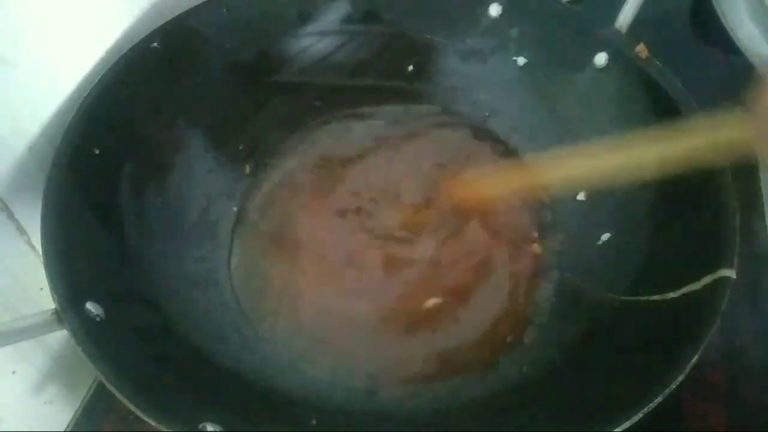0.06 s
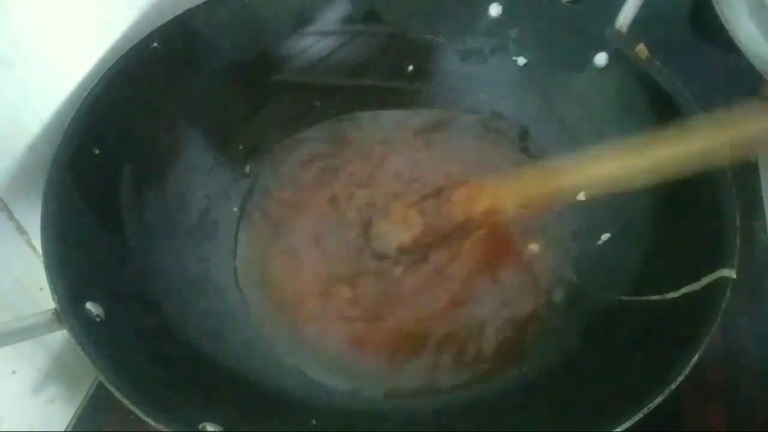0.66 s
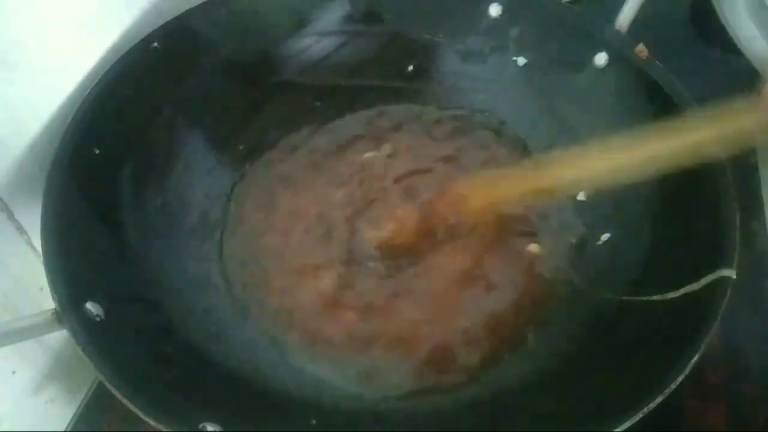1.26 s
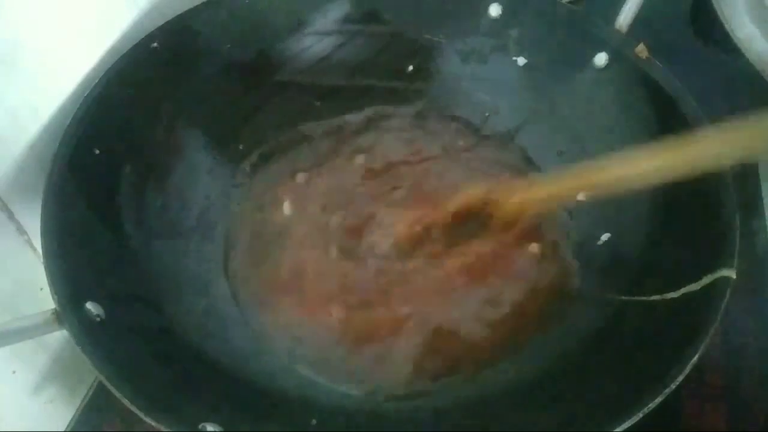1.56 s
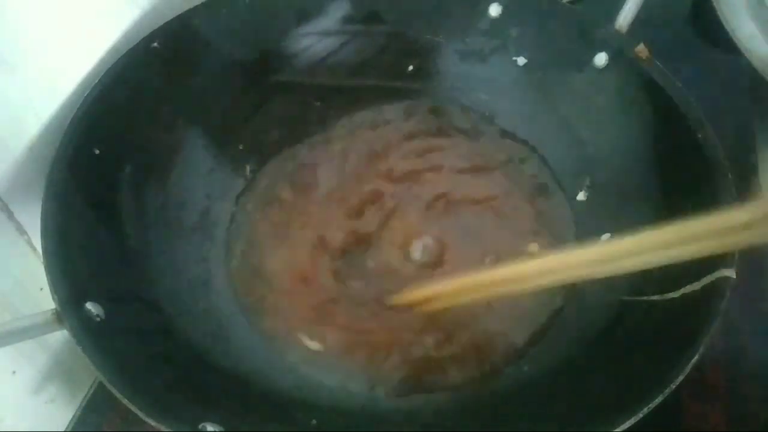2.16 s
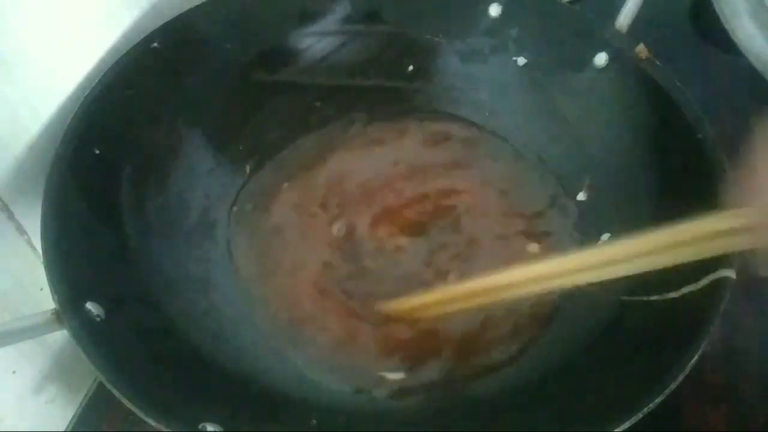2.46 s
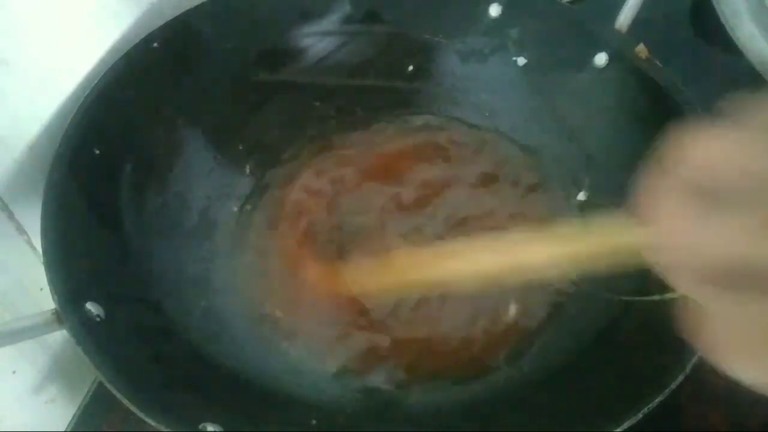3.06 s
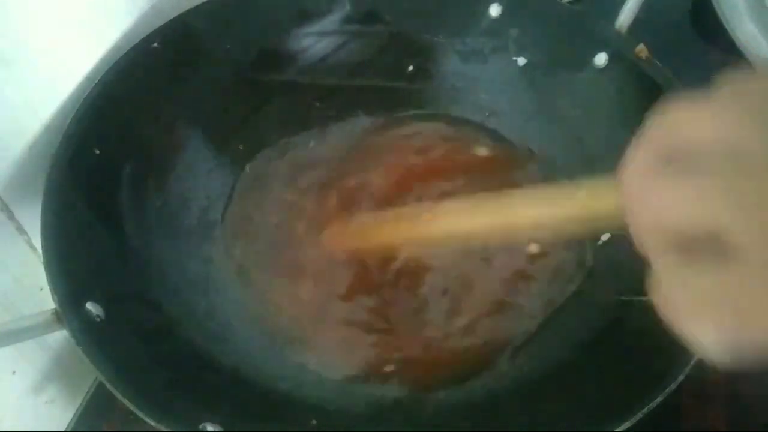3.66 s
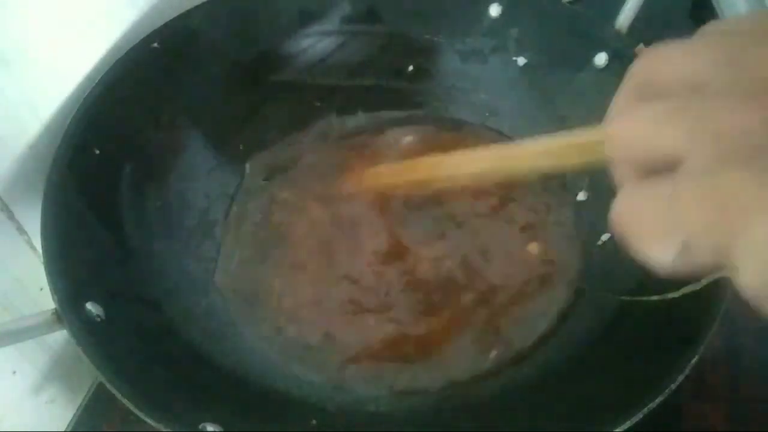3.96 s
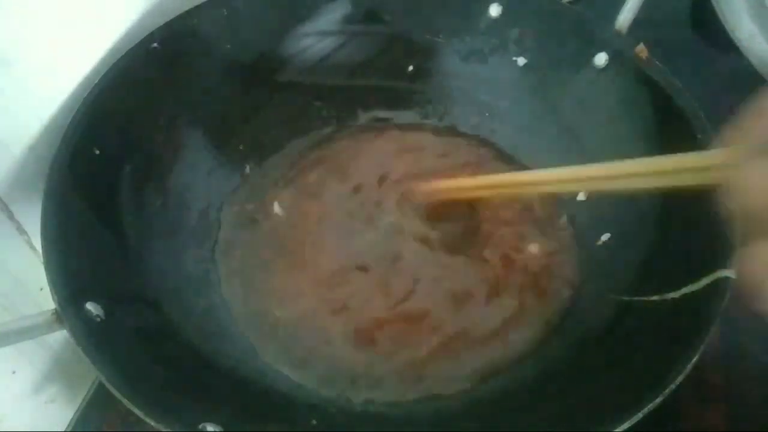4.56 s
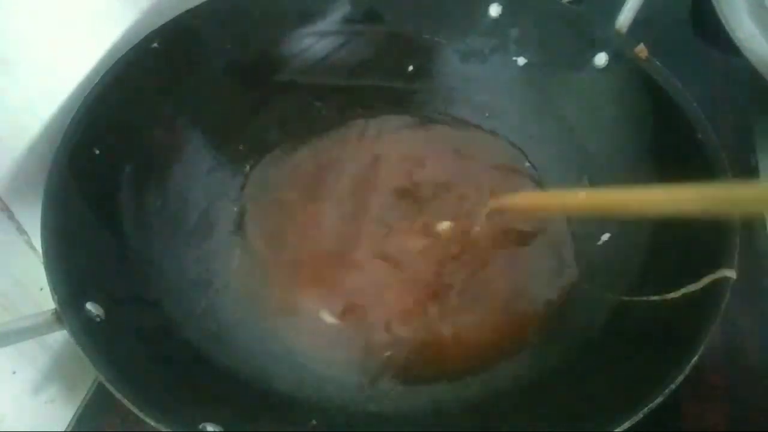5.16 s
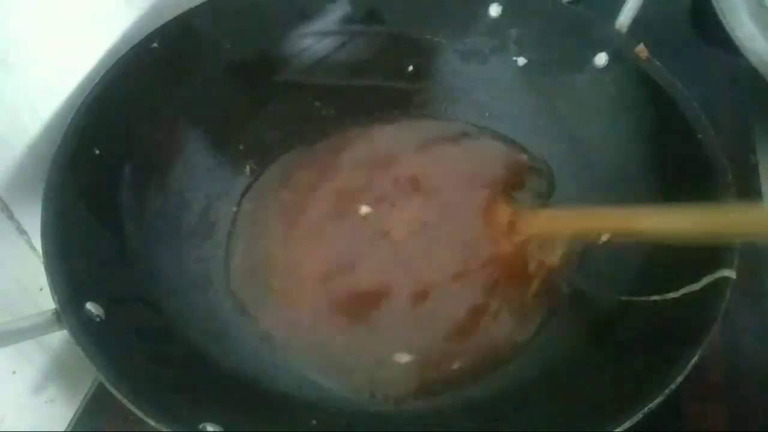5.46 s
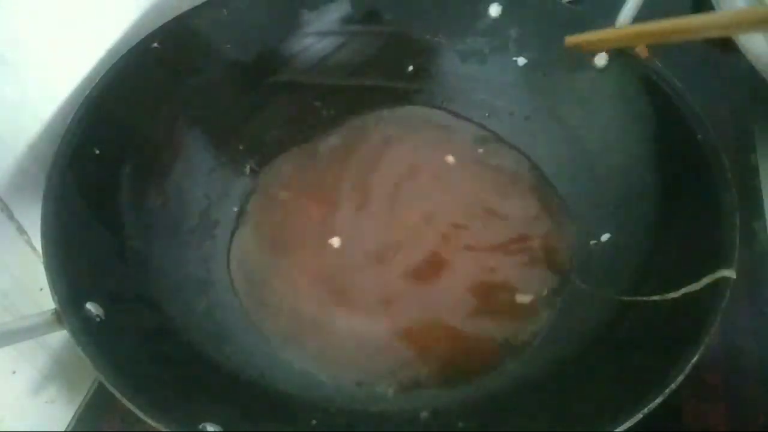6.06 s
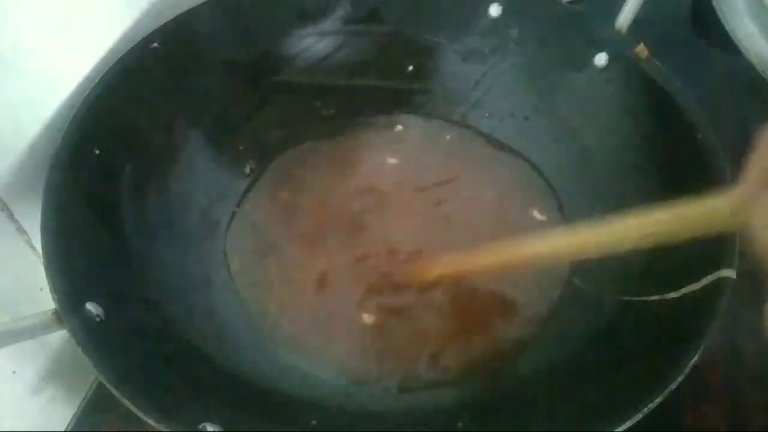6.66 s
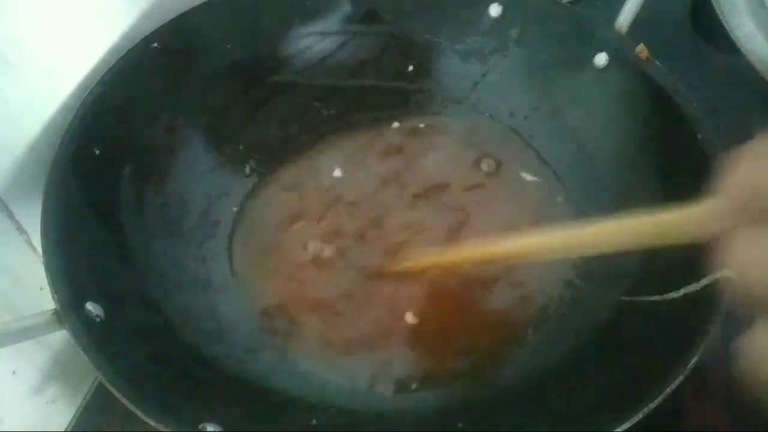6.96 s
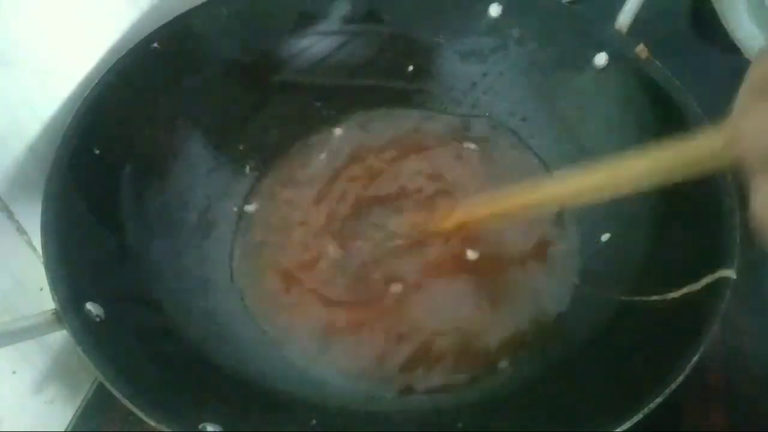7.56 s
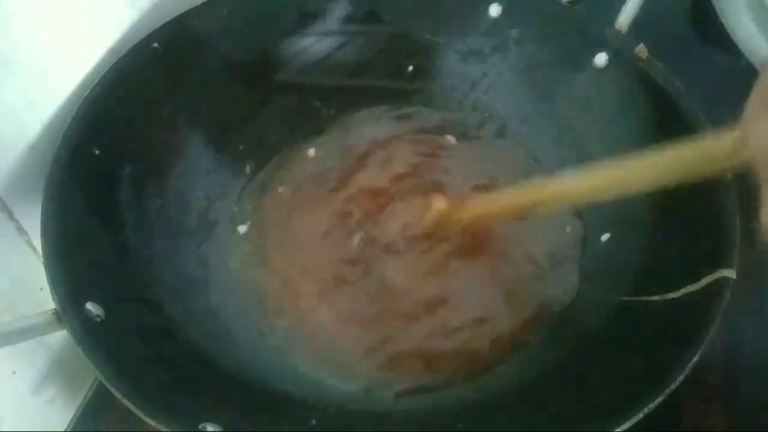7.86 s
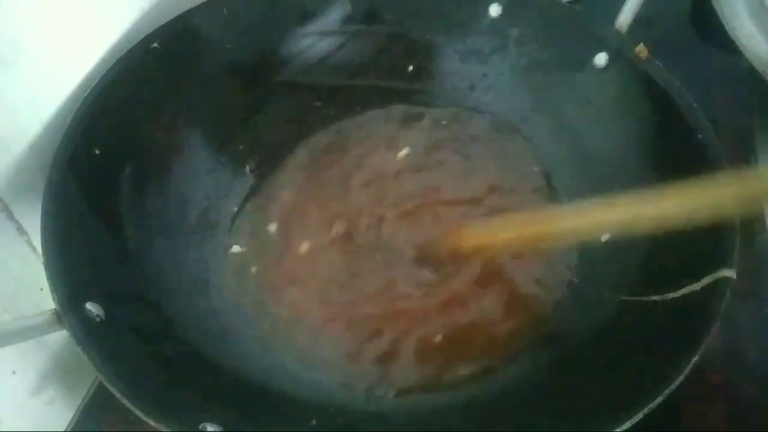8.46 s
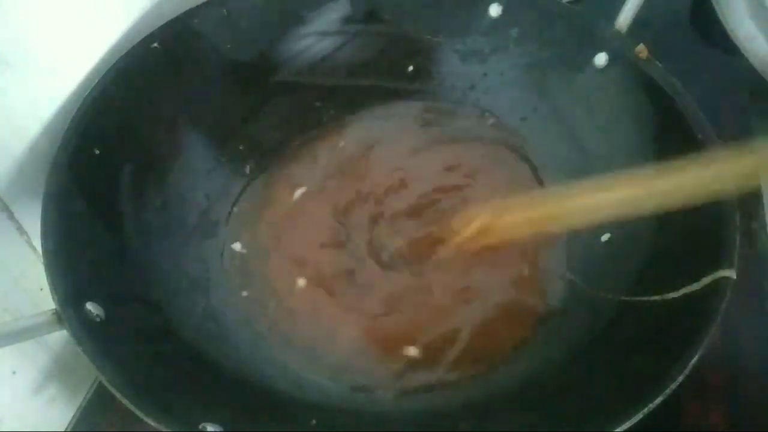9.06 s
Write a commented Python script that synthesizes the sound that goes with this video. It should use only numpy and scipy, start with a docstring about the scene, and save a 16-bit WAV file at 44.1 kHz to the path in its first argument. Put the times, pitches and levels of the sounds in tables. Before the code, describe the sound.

Sauce sizzles in a hot wok throughout, heard close up in a kitchen: a bright, steady, wet hiss of tiny bubbles that swells as the liquid washes over hot metal, with scattered sharp spits. From the start, wooden chopsticks circle about three times a second, rubbing the pan and making short, cushioned metallic knocks with occasional soft squelches. A dull, low bump comes at about 3.8 seconds. The stirring stops near 5 seconds, leaving the sizzle and another soft bump at about 5.3 seconds. At about 6.6 seconds a tip clacks on bare metal with a brief ring, and the scraping, tapping and squelching resume until the end, just after 9 seconds. The sizzle is a little stronger in this last stretch. Underneath, two faint, thin whines, probably from the stove, drift slightly in pitch over a quiet, low drone.

```python
"""Kitchen stove, stereo microphone close to a hot wok of sizzling sauce.
Countless tiny steam bubbles burst at the rim and flare where sauce washes over hot metal; a few spit.
Wooden chopsticks circle about three times a second, rub and knock the wok's modes, squelch, rest, resume.
Two thin whines, probably from the stove, creep in pitch over a few dull bumps and a low kitchen drone."""
import sys
import numpy as np
from scipy import signal
from scipy.fft import rfft, irfft
from scipy.io import wavfile
from scipy.ndimage import uniform_filter1d, map_coordinates

SR = 44100
rng = np.random.default_rng(int(sys.argv[2]) if len(sys.argv) > 2 else 0)


def generate_wav(sig):
    """Save sig (samples, or channels by samples) to the path in sys.argv[1] as 16-bit PCM at SR."""
    pcm = np.round(np.clip(np.atleast_2d(sig).T, -1, 1) * 32767).astype(np.int16)
    wavfile.write(sys.argv[1], SR, pcm)


N = 410967
TIME_S = np.arange(N) / SR

# Sizzle colour. Each row: frequency in Hz, left gain in dB, right gain in dB.
SIZZLE_SPECTRUM = [(610, -26.5, -28), (1710, -20, -18.5), (3800, -30, -32.5), (3780, -14, -14),
                   (5350, -15.5, -13), (5600, -7, -18), (6050, -7.5, -14), (7730, -4, -19),
                   (8100, -13.5, -9), (9590, -9.5, -13.5), (10010, -36, -3.5), (11660, -28, -5.5),
                   (12400, -18, -12.5), (15500, -30, -17)]
# Slow course of the boil. Each row: time in seconds, fizz swell in dB, simmer swell in dB.
BOIL_COURSE = [(0, -2.5, -7.5), (.5, -1.5, -0.5), (1.201, -3, -1.5), (2.1, 1, -1), (2.7, 0.5, -1),
               (3.35, -0.8, -1), (3.55, -3.5, -3), (4.1, -2, 0), (4.5, -1.3, -2.5), (5.1, -4, -6),
               (5.42, -1.5, -5.5), (5.53, 1.5, -4), (6.5, 0.1, -3.5), (7, 0.5, -3), (7.5, 2.5, -1.5),
               (8.15, 0.8, -0.5), (9.32, 0.5, -2)]
# Sauce washing over hot metal. Each row: peak time in seconds, extra fizz in dB, extra simmer in dB.
BOIL_FLARES = [(.1, 2, 0), (.54, 3, 4), (.96, 5, 3), (1.34, 2.5, 2), (1.55, 2.5, 4.5), (1.88, 1.5, 2.5),
               (2.17, 2, -2.5), (2.78, 0, 1.5), (3.65, 3.5, 1.5), (3.83, 5, 1), (4.77, 1, -2),
               (5.2, 3.5, -1), (8.78, 3, -2.5), (9.22, 2, 2.5)]
# Loud spits. Each row: time in seconds, relative snap level in dB, relative splat level in dB, pitch in Hz.
SPIT_EVENTS = [(0.0525, -20.5, -52, 9600), (0.2403, -21, -62, 11500), (2.407, -27, -56, 4830),
               (2.6552, -21, -62, 10800), (2.9194, -19, -53, 11800), (3.0126, -12.5, -50, 10900),
               (3.0186, -21, -60, 11000), (4.27, -20, -58, 10800), (4.3297, -12.5, -54, 11100),
               (4.6104, -18, -48, 10600), (5.0623, -16.5, -51, 10700), (5.3275, -23, -50, 9500),
               (7.0334, -23, -52, 11000), (7.1592, -19, -54, 11000), (7.2734, -21, -51, 14000),
               (7.5322, -12.5, -49, 11500), (8.4395, -14.5, -54, 11300), (8.7783, -22, -56, 7840),
               (8.7975, -13, -53, 11200), (8.804, -20, -60, 11000), (9.1217, -20, -62, 11000),
               (9.2003, -18, -52, 10500), (9.2627, -12.3, -54, 11500)]
# Wok modes. Each row: frequency in Hz, width in Hz, gain in dB touched in sauce, gain in dB on bare wall.
WOK_MODES = [(582, 5, -16, -1), (616, 16, 8, -11), (648, 20, 6, -4), (680, 22, 2, -5), (876, 9, -22, 2),
             (902, 9, -17, 3), (926, 26, -5, -12), (1158, 24, -22, -14), (1362, 45, -18, -11),
             (1445, 27, -4.5, -9.5), (1575, 70, -14.5, -16), (2095, 40, -34, -5), (2640, 45, -30, -13)]
# Path of the tips. Each row: time in seconds, place from 0 (deep in sauce) to 1 (bare wall).
TIP_PLACE = [(0, 0.29), (4.8, 0.35), (6.6, 0.52), (7.4, 0.62), (8, 0.55), (9.3, 0.26)]
# Chopstick strokes. Each row: start in seconds, length in seconds, pressure in dB, scratchiness in dB.
TIP_STROKES = [(0.034, 0.087, -51.5, -55), (0.12, 0.23, -54.5, -49.5), (0.31, 0.29, -50, -49),
               (0.624, 0.14, -50.5, -59), (0.788, 0.067, -50, -45.5), (0.92, 0.21, -51, -50),
               (1.12, 0.34, -49.5, -52), (1.476, 0.088, -52.5, -51), (1.635, 0.19, -52, -50.5),
               (1.865, 0.22, -48.5, -51.5), (2.202, 0.2, -50, -51), (2.511, 0.24, -53.5, -49),
               (2.83, 0.21, -51, -50), (3.177, 0.19, -49, -48.5), (3.477, 0.25, -51.5, -51),
               (3.76, 0.43, -53, -53.5), (4.117, 0.37, -52, -55), (4.502, 0.17, -49, -55),
               (4.988, 0.011, -45, -42), (6.254, 0.067, -59.5, -75), (6.592, 0.23, -57, -62),
               (6.768, 0.1, -48.5, -52), (6.946, 0.26, -50, -53.5), (7.258, 0.27, -48.5, -51.5),
               (7.59, 0.2, -51.5, -50), (7.842, 0.31, -52.5, -59), (8.154, 0.21, -50.5, -55),
               (8.417, 0.22, -50.5, -57), (8.656, 0.19, -56, -75), (8.875, 0.11, -53, -51),
               (9.034, 0.097, -54, -61), (9.167, 0.13, -53, -65)]
# Chopstick knocks. Each row: start in seconds, relative level in dB, place from 0 to 1,
# added damping in Hz (sign ignored), high-mode boost in dB.
TIP_KNOCKS = [(.048, -35.5, 0, 15, -18), (.143, -44, 0.3, 3, 25), (.28, -37, 0.3, -1, 11),
              (.355, -34, 0, 8, 0), (.43, -33, 0, -9, 5), (.46, -47, 0, 0, 33), (.699, -32.5, 0, 9, 1),
              (.74, -29, 0, -4, 36), (.838, -36, 0.3, 7, 24), (.959, -31.5, 0, 18, 3),
              (1.275, -32, 0, 1, -3), (1.54, -30, 0, 21, -2), (1.565, -35.5, 0, 2, 29),
              (1.735, -39.5, 0, 21, 0), (2.01, -33.5, 0.37, 18, -5), (2.255, -31, 0, 28, -11),
              (2.3, -37, 0, 5, 20), (2.53, -39, 0, 28, 7), (2.65, -37.5, 0, 29, -8), (2.9, -37.5, 0, 23, 0),
              (2.958, -37, 0, 31, -10), (3.235, -30.5, 0.4, -1, -6), (3.295, -41, 0.2, 2, 31),
              (3.818, -31, 0, 0, 3), (4.16, -34, 0.06, 18, -9), (4.555, -37, 0.1, 15, 5),
              (4.615, -37, 0.15, 3, -8), (4.675, -38, 0.06, 23, -2), (6.575, -26, 1, 1.5, 4.5),
              (6.703, -38, 0.93, -1, -12), (6.809, -29, 0, -1, -19), (7.122, -38, 0, -4, -4),
              (7.373, -37, 0, 10, -3), (7.445, -37.5, 0.2, 8, -11), (7.612, -32, 0, 56, -6),
              (7.716, -39, 0.2, 20, -4), (8.015, -40, 0, 9, -11), (8.195, -36, 0.4, 4, -10),
              (8.48, -45, 0, 4, -8), (8.79, -44, 0, -3, -6), (8.93, -35.5, 0.14, 17, 3),
              (9.085, -36, 0.03, 10, 8), (9.22, -36, 0.05, -1, -15)]
# Squelches. Each row: start in seconds, length in seconds, centre in Hz, width in Hz, relative level in dB.
SAUCE_SQUELCHES = [(0.351, 0.018, 1460, 800, -41.5), (0.716, 0.036, 1510, 1000, -45.5),
                   (0.935, 0.051, 1500, 1200, -47), (0.995, 0.16, 1540, 1410, -47.5),
                   (1.313, 0.099, 1250, 1110, -47), (4.606, 0.0178, 2520, 348, -42),
                   (4.977, 0.058, 1570, 650, -46), (5.6, 0.025, 1300, 1020, -45),
                   (6.809, 0.056, 2090, 2200, -45), (6.987, 0.054, 1330, 1100, -50.5),
                   (7.067, 0.055, 1280, 900, -51), (7.267, 0.024, 920, 650, -52),
                   (7.375, 0.045, 1040, 650, -50), (7.428, 0.05, 1190, 1000, -47.5),
                   (7.645, 0.0095, 1240, 900, -47)]
# Partials of the rising whine. Each row: harmonic number, start in seconds, end in seconds,
# relative level in dB, hoarseness from 0 to 1.
RISING_PARTIALS = [(41, 5.8, 8.3, -55, .9), (42, -.5, 2.9, -53, 0), (43, -.5, .8, -56, 0),
                   (43, 5.3, 6.6, -50, .3), (43, 8.2, 9.8, -47, .5), (44, -.5, 2.2, -50, .9),
                   (44, 2.5, 5.1, -46.5, .9), (44, 4.7, 6, -54, .1), (44, 5.7, 7.1, -49.5, .2),
                   (44, 7.5, 9.8, -47.5, .9), (45, -.5, 2.5, -54, 0), (45, 6.1, 8.2, -51, .9),
                   (46, -.5, 1.5, -53, 0), (46, 1, 2.8, -47.5, .05), (46, 3, 4.9, -54, .4),
                   (46, 4.7, 5.9, -50, 0), (46, 5.4, 7.6, -43.7, .1), (46, 6.6, 8, -46.5, .9),
                   (47, -.5, 2.9, -51, .05), (47, 4.6, 7.1, -51.5, .15), (48, -.5, 5.1, -48, .7),
                   (48, 4.8, 7, -53, .1), (48, 7.3, 9.8, -50, .9), (49, -.5, 2.4, -56, 0),
                   (49, 6.2, 7.2, -55, .1), (50, -.5, 3, -52, .05), (50, 4.8, 7, -53, .1),
                   (51, -.5, 2.4, -56, .1), (51, 4.8, 6.9, -51, .05)]
# Partials of the whine that sags and recovers. Each row: as above.
SAGGING_PARTIALS = [(38, 2.4, 5.6, -56, .1), (39, 2.8, 4.1, -50.5, .05), (39, 4, 5.6, -55, 0),
                    (39, 6.2, 7.3, -53, .1), (40, -.5, 1.8, -48, .35), (40, 2.2, 4.3, -50, .2),
                    (40, 5.3, 6.4, -46.5, .4), (40, 6.1, 7.1, -52, .4), (40, 7.7, 9.8, -53, .6),
                    (41, 7.5, 9.8, -53, .3), (42, 4, 5.4, -53, 0), (42, 6.9, 7.9, -55, .1),
                    (44, 4.5, 6, -54, 0), (45, 7.6, 8.5, -51, .3)]
# Their fundamentals. Each row: time in seconds, frequency in Hz.
RISING_PITCH = [(0, 140), (1.1, 140.17), (2.6, 140.75), (4.7, 142.05), (5.6, 142.2), (6.8, 142.7),
                (9.32, 144.1)]
SAGGING_PITCH = [(0, 153.6), (1.5, 152.85), (2.6, 152.55), (5.3, 152.25), (6, 153), (6.7, 153.6),
                 (9.32, 153.9)]
# Dull bumps. Each row: start in seconds, level in dB, pitch in Hz, width in Hz, decay in seconds.
STOVE_BUMPS = [(3.75, -34.5, 64.7, 142, 0.01), (3.796, -42.5, 95, 120, 0.022), (5.278, -54, 346, 260, 0.13),
               (5.336, -43.5, 157, 67.6, 0.032), (5.337, -46, 393, 317, 0.037),
               (6.576, -54, 260, 200, 0.03)]
# Drone colour. Each row: frequency in Hz, gain in dB.
DRONE_SPECTRUM = [(14, -3.5), (26, 6.5), (36, -10), (60, -7), (82, -1.5), (110, -17.5), (160, -6.5),
                  (240, -21), (420, -22.5), (900, -24.5), (2000, -43)]
# Kitchen reverberation. Each row: frequency in Hz, T60 in seconds.
KITCHEN_T60 = [(150, 0.0055), (1000, 0.1), (5000, 0.058), (14000, 0.0039)]

HIGH_MODES_HZ = 1100
SLOSH_HZ = 6  # rms detuning of the modes by sliding sauce


def sizzle(level_db=-38, split_hz=8200, hiss_share=.81, seethe_db=1.25, seethe_per_s=26):
    """Bursts and pops swell as sauce washes over hot metal; the fine fizz swells most."""
    pops = popping()
    pop_gains, blur_gains = gain_of([[-8], [-5.5]]), gain_of([[2], [-5]])  # left, right
    bubbles = bubbling() + pop_gains * (pops + gain_of(-5) * room(pops[1]))
    bubbles += blur_gains * rng.standard_normal((2, N))  # bursts blurred smooth by the room
    spectrum = np.array(SIZZLE_SPECTRUM)
    bubbles = unit_rms(np.array([colour(unit_rms(bubbles[k]), spectrum[:, [0, k + 1]]) for k in (0, 1)]))
    swell_db = boil_db(1) + seethe_db * drift(seethe_per_s)
    hiss = signal.sosfiltfilt(signal.butter(4, split_hz, fs=SR, output="sos"), bubbles)
    fizz = bubbles - hiss
    return gain_of(level_db) * (hiss * gain_of(hiss_share * swell_db) + fizz * gain_of(swell_db))


def bubbling(per_s=7000, clump_db=1.6, scatter_s=.0004, spots=8):
    """Tiny bursts round the rim; the bowl scatters each spot differently to each channel."""
    out, t = np.zeros((2, N)), TIME_S[:128]
    clumps = gain_of(clump_db * drift(220))
    for _ in range(spots):
        spectra = rfft(rng.standard_normal((2, 128)) * np.exp(-t / scatter_s), 512)
        paths = np.roll(irfft(spectra / abs(spectra)), 128, axis=1)  # all-pass
        bursts = clicks(per_s / spots, spread_db=3.1) * clumps
        out += signal.oaconvolve(bursts[None], paths, axes=1)[:, :N]
    return unit_rms(out)


def popping(per_s=420, ring_s=.0003, low_hz=5500, high_hz=15000, sizes=24):
    """Larger bubbles ring for a few cycles, each size at its own pitch."""
    out, t = np.zeros((2, N)), TIME_S[:128]
    pops, size_class = clicks(per_s, spread_db=2.6), rng.integers(0, sizes, N)
    for k, hz in enumerate(np.linspace(low_hz, high_hz, sizes)):
        envelope = np.exp(-t / ring_s) * np.minimum(t * hz, 1)
        ring = np.sin(2 * np.pi * (hz * t + rng.random((2, 1)))) * envelope
        for at in np.flatnonzero(pops * (size_class == k)):
            add(out[0], at / SR, pops[at] * ring[0])
            add(out[1], at / SR, pops[at] * ring[1])
    return unit_rms(out)


def simmer(level_db=-55.5, per_s=1500, wet_db=-7):
    """Fatter bubbles in the thick of the sauce: a soft, wet crackle."""
    bubbles = resonate_twice(clicks(per_s, spread_db=3), hz=3000, width_hz=1600)
    crackle = unit_rms(bubbles) * gain_of(boil_db(2))
    return gain_of(level_db) * (crackle + gain_of(wet_db) * room(crackle))


def boil_db(column, flare_s=.049):
    """Swell of the fizz (column 1) or simmer (column 2): slow course plus Gaussian flares."""
    course = np.array(BOIL_COURSE)
    flares_db = sum(row[column] * np.exp(-((TIME_S[::64] - row[0]) / flare_s) ** 2) for row in BOIL_FLARES)
    return np.interp(TIME_S, course[:, 0], course[:, column]) + flares_db.repeat(64)[:N]


def spits(delay_s=.001, ring_s=.0004, splat_s=.0016, echo_gain=.35, echo_s=.0006, left_db=-13, wet_db=-9):
    """A big bubble bursts with a crack, rings over a short splat and echoes off the wok's wall."""
    out, t = np.zeros((2, N)), TIME_S[:512]
    crack = .75 * cut(signal.unit_impulse(len(t)), 6500, "high", order=2)
    for (s, snap_db, splat_db, hz), detour in zip(SPIT_EVENTS, rng.random(len(SPIT_EVENTS))):
        ring = np.sin(2 * np.pi * hz * t) * np.exp(-t / ring_s)
        snap = gain_of(snap_db + 3.5) * (ring + crack)
        noise = unit_rms(resonate(rng.standard_normal(len(t)), hz=3200, width_hz=4000))
        splat = gain_of(splat_db + 11) * noise * np.exp(-t / splat_s)
        for side, gain in zip(out, gain_of([left_db, 0])):
            add(side, s + delay_s, gain * snap + splat)
            add(side, s + delay_s + echo_s * (1 + detour), echo_gain * gain * snap)
    return out + gain_of(wet_db) * room(out.mean(0))


def stirring(slips_per_s=170, rub_db=.3, scratch_db=-6.8, damping_hz=10, judder_db=2.3):
    """Tips stick and slip on the metal; pressure feeds the low modes, scratching the high ones."""
    slips = clicks(slips_per_s, spread_db=2.5)
    place = np.interp(TIME_S, *np.transpose(TIP_PLACE))
    slosh = np.exp(2j * np.pi * np.cumsum(SLOSH_HZ * drift(7)) / SR)
    bands = np.zeros((2, N))
    for hz, width_hz, deep_db, wall_db in WOK_MODES:
        pole = np.exp((2j * np.pi * hz - np.pi * (width_hz + damping_hz)) / SR)
        # Double pole: cushioned slips build the ring gradually.
        mode = (slosh * signal.lfilter([1], np.poly([pole, pole]), slips / slosh + 1e-18)).real
        bands[int(hz > HIGH_MODES_HZ)] += unit_rms(mode) * gain_of(deep_db + place * (wall_db - deep_db))
    low, high = bands / np.sqrt(abs(uniform_filter1d(bands ** 2, size=2600)) + 1e-14)
    rub = low * gain_of(rub_db) * stroke_force(2)
    scratch = high * gain_of(scratch_db) * stroke_force(3)
    return (rub + scratch) * gain_of(judder_db * drift(20))


def stroke_force(column, bite_s=.036, ease_db_per_s=15, lift_s=.045, brush_db=-12, brush_s=.2, lurch_hz=8.7):
    """Pressure (column 2) or scratchiness (column 3): tips bite, lurch, ease off, lift and brush on."""
    force, t = np.zeros(N), TIME_S[:SR]
    bite = np.minimum(t / bite_s, 1)
    lurch_db = 2 * np.cos(2 * np.pi * lurch_hz * (t - bite_s))
    for row in TIP_STROKES:
        start_s, length_s = row[:2]
        lifted_s = np.maximum(t - length_s, 0)
        release = np.maximum(np.exp(-lifted_s / lift_s), gain_of(brush_db) * np.exp(-lifted_s / brush_s))
        add(force, start_s, bite * gain_of(row[column] + lurch_db - ease_db_per_s * t) * release)
    return force


def knocks(trim_db=-3, cushion_s=.004, clack_db=-13, clack_s=.007):
    """A tip hits the wok: sauce cushions it, glancing blows ring the high modes, bare metal clacks."""
    out, t = np.zeros(N), TIME_S[:SR // 3]
    noise = unit_rms(resonate_twice(rng.standard_normal(len(t)), hz=1900, width_hz=2600))
    clack = gain_of(clack_db) * noise * np.exp(-t / clack_s)
    for start_s, db, place, damping_hz, high_db in TIP_KNOCKS:
        ring = wok_ring(t, place, damping_hz, high_db)
        ring *= 1 - np.exp(-t / (cushion_s * max(1 - place, .1)))
        add(out, start_s, gain_of(db + trim_db) * (ring / abs(ring).max() + place ** 2 * clack))
    return cut(out, 500, "high")  # little radiation below the first mode


def wok_ring(t, place, damping_hz, high_db):
    """Neighbouring modes start in opposite directions and beat; sauce damps and detunes them."""
    ring = np.zeros(len(t))
    shift_hz = (1 - place) * SLOSH_HZ * rng.standard_normal()
    for k, (hz, width_hz, deep_db, wall_db) in enumerate(WOK_MODES):
        gain = gain_of(deep_db + place * (wall_db - deep_db) + high_db * (hz > HIGH_MODES_HZ))
        decay = np.exp(-np.pi * (width_hz + abs(damping_hz)) * t)
        ring += (-1) ** k * gain * np.sin(2 * np.pi * (hz + shift_hz) * t) * decay
    return ring


def squelches(trim_db=-5, rise_octaves=.52):
    """Sauce parts behind the tips: crackle in a cavity whose pitch rises as it closes."""
    out, crackle = np.zeros(N), clicks(2500, spread_db=.8)
    for start_s, length_s, centre_hz, width_hz, db in SAUCE_SQUELCHES:
        count = int(length_s * SR)
        hz = centre_hz * 2 ** (rise_octaves * np.linspace(-.5, .5, count))
        cavity = resonate_twice(crackle[int(start_s * SR):][:count], hz, width_hz)
        add(out, start_s, gain_of(db + trim_db) * unit_rms(cavity * signal.windows.tukey(count, .5)))
    return cut(out, 700, "high")


def whine(pitch, partials, trim_db, fade_s=.34, right_db=-8):
    """High partials of a creeping tone fade in and out, clear or hoarse, phase-shifted on the right."""
    out = np.zeros((2, N))
    turns = np.cumsum(np.interp(TIME_S, *np.transpose(pitch))) / SR
    for harmonic, start_s, end_s, db, hoarse in partials:
        span = slice(*np.searchsorted(TIME_S, [start_s, end_s]))
        t = TIME_S[span]
        fade = np.minimum(np.minimum(t - start_s, end_s - t) / fade_s, 1)
        roughness = np.sqrt(1 - hoarse) + np.sqrt(hoarse) * flutter(t)
        tone = gain_of(db + trim_db) * fade * roughness * wavering_tone(harmonic * turns[span])
        out[0, span] += tone.real
        out[1, span] += gain_of(right_db) * (tone * np.exp(2j * np.pi * rng.random())).real
    return out


def wavering_tone(turns, swell_db=2.3, waver_rad=.28):
    """Complex tone that wavers in level and a little in phase."""
    phase = 2 * np.pi * (turns + rng.random()) + waver_rad * drift(12)[:len(turns)]
    swell = unit_rms(gain_of(swell_db * drift(5)[:len(turns)]))
    return np.sqrt(2) * swell * np.exp(1j * phase)


def flutter(t, spacing_hz=28, fall_db=3, blur_hz=4):
    """Blurred sidebands of rms 1 that make a partial hoarse."""
    orders, coarse_s = np.arange(-2, 3)[:, None], t[::16]
    heights = gain_of(-fall_db * abs(orders))
    walk = np.cumsum(rng.standard_normal((len(orders), len(coarse_s))), 1)
    blur_rad = walk * np.sqrt(2 * np.pi * blur_hz * 16 / SR)
    turns = orders * spacing_hz * coarse_s + rng.random(orders.shape)
    sidebands = heights * np.exp(2j * np.pi * turns + 1j * blur_rad)
    return sidebands.sum(0).repeat(16)[:len(t)] / np.linalg.norm(heights)


def bumps():
    """Soft, low thuds that die quickly."""
    out, t = np.zeros(N), TIME_S[:SR // 3]
    for start_s, db, hz, width_hz, decay_s in STOVE_BUMPS:
        body = resonate_twice(rng.standard_normal(len(t)), hz, width_hz) * np.exp(-t / decay_s)
        add(out, start_s, gain_of(db) * body / np.sqrt(np.sum(body ** 2) / (decay_s * SR)))
    return out


def drone(level_db=-55, side_db=-17):
    """Steady low kitchen noise, nearly mono."""
    mid, side = (unit_rms(colour(noise, DRONE_SPECTRUM)) for noise in rng.standard_normal((2, N)))
    return gain_of(level_db) * (mid + gain_of(side_db) * np.array([side, -side]))


def room(x):
    """Diffuse kitchen reflections of energy 1, different in each channel."""
    hz, t, noise = signal.stft(rng.standard_normal((2, SR // 2)), SR, nperseg=256)
    decay = gain_of(-60 * t / at_hz(KITCHEN_T60, hz)[:, None]) * (t > 0)
    tail = signal.istft(noise * decay, SR, nperseg=256)[1]
    return signal.fftconvolve(x[None], tail / np.linalg.norm(tail[0]), axes=1)[:, :N]


def clicks(per_s, spread_db):
    """Random clicks of either sign, a few much larger than the rest."""
    size = gain_of(spread_db * np.minimum(rng.exponential(1, N), 5))
    return size * rng.choice([-1., 1.], N) * (rng.random(N) < per_s / SR)


def drift(per_s):
    """Smooth random curve of rms 1."""
    knots = rng.standard_normal(4096)
    return unit_rms(map_coordinates(knots, [TIME_S[::64] * per_s], order=3, mode="wrap")).repeat(64)[:N]


def resonate(x, hz, width_hz):
    """Resonance that can follow a pitch curve."""
    carrier = np.exp(2j * np.pi * np.cumsum(hz * np.ones(len(x))) / SR)
    radius = np.exp(-np.pi * width_hz / SR)
    return 2 * (carrier * signal.lfilter([1 - radius], [1, -radius], x / carrier + 1e-18)).real


def resonate_twice(x, hz, width_hz):
    """Two equal resonances in series."""
    return resonate(resonate(x, hz, width_hz), hz, width_hz)


def colour(x, spectrum):
    """Minimum-phase filter with the given spectrum."""
    log_gain = np.log(gain_of(at_hz(spectrum, abs(np.fft.fftfreq(8192, 1 / SR)))))
    taps = np.fft.ifft(np.exp(np.conj(signal.hilbert(log_gain)))).real
    return signal.oaconvolve(x, taps[:len(taps) // 2])[:N]


def cut(x, hz, kind, order=4):
    """Low-pass or high-pass."""
    return signal.sosfilt(signal.butter(order, hz, kind, fs=SR, output="sos"), x)


def at_hz(table, hz):
    """Interpolates on a log-frequency axis."""
    knots_hz, values = np.transpose(table)
    return np.interp(np.log(hz + 1), np.log(knots_hz + 1), values)


def add(mix, start_s, sound):
    """Mixes a sound in place."""
    part = mix[max(round(start_s * SR), 0):][:len(sound)]
    part += sound[:len(part)]


def gain_of(db):
    """Decibels to amplitude."""
    return 10 ** (np.asarray(db) / 20)


def unit_rms(x):
    """Scales to rms 1."""
    return x / np.sqrt(np.mean(x ** 2) + 1e-20)


def scene(wok_wet_db=-10.5, squelch_wet_db=-6, bump_wet_db=-17):
    """All sources plus the kitchen's short reverberation."""
    metal, sauce, thuds = stirring() + knocks(), squelches(), bumps()
    send = gain_of(wok_wet_db) * metal + gain_of(squelch_wet_db) * sauce + gain_of(bump_wet_db) * thuds
    echoes = room(send)
    whines = whine(RISING_PITCH, RISING_PARTIALS, trim_db=1.5)
    whines += whine(SAGGING_PITCH, SAGGING_PARTIALS, trim_db=3.5)
    return sizzle() + simmer() + spits() + metal + sauce + whines + thuds + echoes + drone()


def record(dry):
    """Steep low-pass at 15750 Hz."""
    taps = signal.firwin(511, 15750, window=("kaiser", 9), fs=SR)
    return signal.oaconvolve(dry, taps[None], "same", axes=1)


dry = scene()
out = record(dry)
generate_wav(out)
```